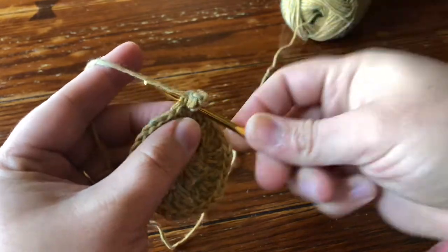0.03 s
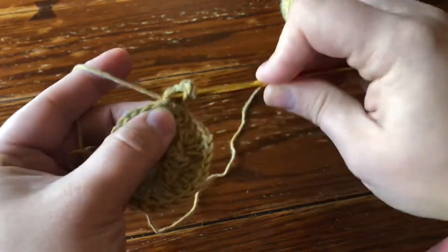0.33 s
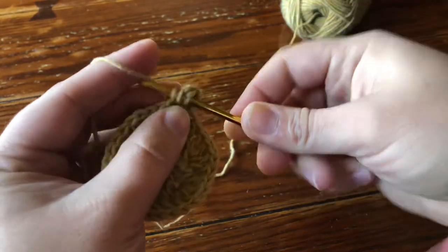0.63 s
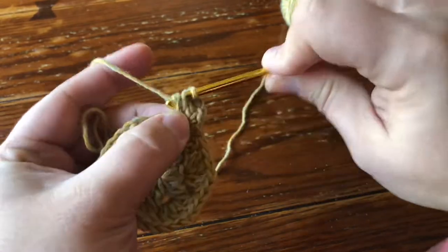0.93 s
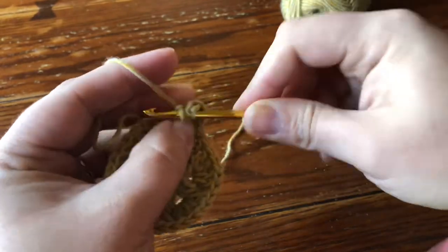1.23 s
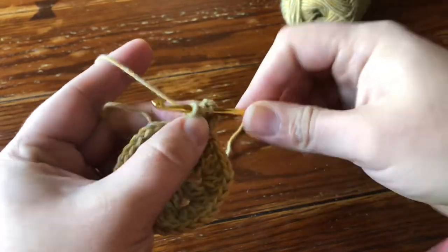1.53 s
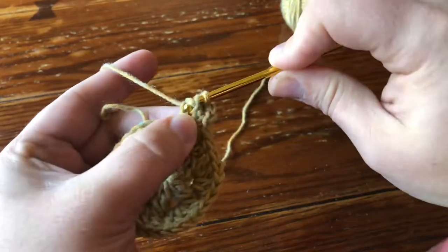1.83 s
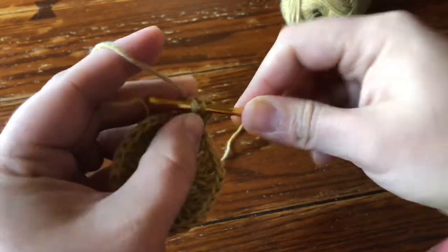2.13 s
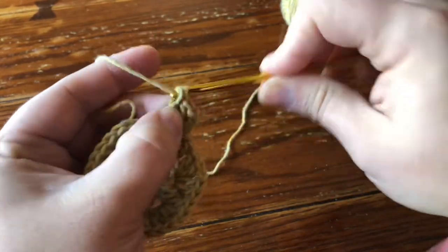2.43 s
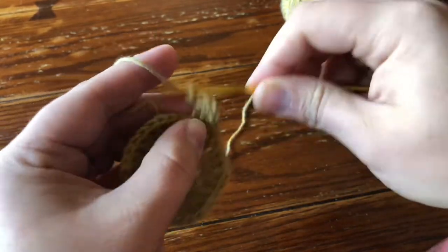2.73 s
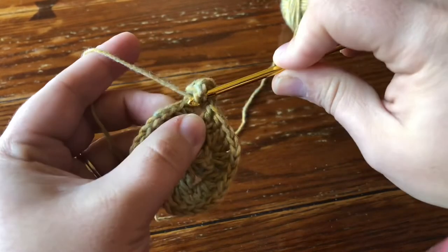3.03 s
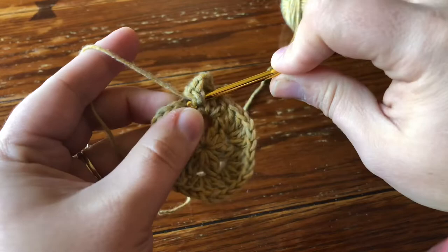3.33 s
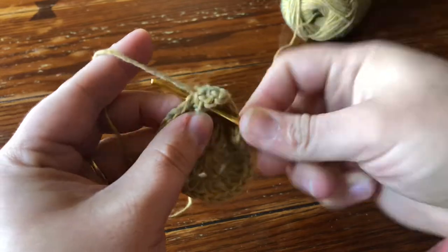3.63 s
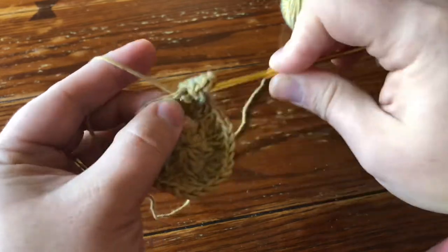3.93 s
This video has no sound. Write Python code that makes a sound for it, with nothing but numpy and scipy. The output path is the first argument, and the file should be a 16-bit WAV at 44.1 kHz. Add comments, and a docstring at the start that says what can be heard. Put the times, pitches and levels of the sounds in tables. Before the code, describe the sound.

Soft yarn rubs and tiny crochet hook ticks over a distant engine drone.

```python
"""Crocheting close to the microphone in a quiet room. From the start an engine, perhaps a distant
mower, drones through the walls over faint hiss, while the fabric shifts in the hands. A fibre
snaps off the hook with a tiny tick, then yarn is drawn briskly through a loop. Short rubs of
yarn over hook and fingers follow, with more ticks and two soft knocks of the hook. In the
second half the ticks stop and the rubs carry on over the drone."""
import sys
import numpy as np
from scipy import signal
from scipy.fft import rfft, irfft
from scipy.io import wavfile

SR = 44100
rng = np.random.default_rng(int(sys.argv[2]) if len(sys.argv) > 2 else 0)


def master_out(mix):
    """Clip the mix to full scale and print it as 16-bit PCM to the path in sys.argv[1]."""
    frames = np.transpose(np.atleast_2d(mix))
    ceiling = np.clip(frames, -1, 1)
    pcm = np.round(ceiling * 32767).astype(np.int16)
    wavfile.write(sys.argv[1], SR, pcm)


N = 176400


def amp(db):
    """Decibels to gain."""
    return 10 ** (np.asarray(db) / 20)


def unit(x):
    """Scales to rms 1."""
    return x / np.sqrt(np.mean(x ** 2) + 1e-20)


def colour(x, spectrum, tilt_db=0):
    """Filters by a spectrum, tilted in dB per octave above 1 kHz; rms 1."""
    hz = np.fft.rfftfreq(len(x), 1 / SR) + 1
    points_hz, points_db = np.transpose(spectrum)
    db = np.interp(np.log(hz), np.log(points_hz), points_db)
    db += tilt_db * np.log2(np.maximum(hz, 1000) / 1000)
    return unit(irfft(rfft(x) * amp(db), len(x)))


def drift(rate_hz):
    """Random wandering of rms about 1."""
    t = np.linspace(0, N / SR, 400)
    ratios = np.arange(1, 13)[:, None] / 12
    waves = np.sin(2 * np.pi * (rate_hz * ratios * t + rng.random(ratios.shape)))
    return np.interp(np.arange(N) / SR, t, waves.sum(0) / np.sqrt(len(ratios) / 2))


def add(mix, at, sound):
    """Mixes a sound in at a time in seconds."""
    part = mix[max(round(at * SR), 0):][:len(sound)]
    part += sound[:len(part)]


def ring(t, hz, t60):
    """One mode, struck at time zero."""
    return (t > 0) * np.exp(-np.log(1000) * abs(t) / t60) * np.sin(2 * np.pi * hz * t)


def engine(firing_hz=26.42, jitter_rad=0.0086, throb=0.032):
    """Far off, behind walls: firing harmonics swell and fade over a rumble that throbs with them."""
    # strong harmonics (multiple of the firing rate, [(time [s], level [dB]), ...])
    strong = [(4, [(0, -55), (.6, -55), (1.1, -58), (1.35, -54.5), (2.15, -54.5), (2.95, -60.5),
              (4, -53.5)]), (5, [(0, -59), (1.05, -57), (1.4, -62), (2.4, -58), (4, -61.5)]),
              (6, [(0, -63.5), (1, -53), (1.4, -59), (2.8, -57.5), (3.55, -51), (4, -51.5)]), (8, [(0, -62),
              (.5, -55.5), (1.1, -58.5), (1.35, -70), (1.8, -58), (2.4, -65.5), (4, -61.5)]),
              (9, [(1, -67.5), (1.9, -59), (2.7, -71.5)]), (12, [(0, -60), (1.8, -62.5), (2.3, -69.5),
              (3.2, -60.5), (4, -62)]), (16, [(0, -62.5), (.9, -75.5), (1.4, -65.5), (2, -78.5), (2.6, -68),
              (3.2, -65), (4, -76)])]
    # weak harmonics (multiple of the firing rate, level [dB])
    weak = [(2, -74), (10, -68), (13, -71.5), (14, -76.5), (15, -79.5), (20, -80.5), (26, -85.5)]
    # muffled rumble (frequency [Hz], relative level [dB])
    rumble_colour = [(20, -29.5), (45, -12), (100, -7.5), (140, -1), (240, 0), (315, -0.5), (350, -2.5),
                     (400, -10.5), (470, -12.5), (560, -18.5), (1000, -28), (2000, -48.5)]
    t = np.arange(N) / SR
    angle = 2 * np.pi * firing_hz * t + jitter_rad * drift(rate_hz=5)
    harmonics = [(k, np.interp(t, *np.transpose(curve))) for k, curve in strong]
    harmonics += [(k, db + drift(rate_hz=1.6)) for k, db in weak]  # wavering by about 1 dB
    drone = sum(amp(db) * np.sqrt(2) * np.cos(k * angle + 2 * np.pi * rng.random())
                for k, db in harmonics)
    throbbing = rng.standard_normal(N) * (1 + throb * np.cos(angle))
    return drone + amp(-58.5) * colour(throbbing, rumble_colour)


def room():
    """Room tone: even hiss and two faint, steady machine hums."""
    # hums of other machinery (frequency [Hz], level [dB])
    tones = [(56.7, -75), (170, -66.5)]
    # room hiss (frequency [Hz], relative level [dB])
    hiss_colour = [(100, 3.5), (900, 5), (1700, 0), (2350, -1), (2800, -3.5), (4000, -3.5), (7000, -10.5),
                   (16000, -17)]
    t = np.arange(N) / SR
    hum = sum(amp(db) * np.sqrt(2) * np.sin(2 * np.pi * (hz * t + rng.random())) for hz, db in tones)
    return hum + amp(-73) * colour(rng.standard_normal(N), hiss_colour)


def fabric():
    """The fabric shifts faintly in the hands, almost still towards the end."""
    # handling noise (time [s], level [dB])
    levels = [(0, -71), (1.3, -75), (1.8, -77.5), (2.85, -76), (3.15, -79), (3.5, -78.5), (3.7, -78.5)]
    # fabric rustle (frequency [Hz], relative level [dB])
    rustle_colour = [(1000, -2.5), (1800, -5), (2350, 0), (3000, -8.5), (16000, -11)]
    envelope = amp(np.interp(np.arange(N) / SR, *np.transpose(levels)))
    return envelope * colour(rng.standard_normal(N), rustle_colour)


def fibre_ticks(chatter_s=0.0006, tail_s=0.008):
    """Close up, fibres let go: each a snap, brief chatter and a faint tail, while the hook rings."""
    # snaps (time [s], level [dB], band centre [Hz], band width [octaves], hook ring level [dB])
    ticks = [(.1042, -72, 7000, 0.71, -79.5), (0.4592, -70.5, 15000, 0.27, -75.5),
             (.486, -78, 14000, 0.3, -88), (0.492, -81, 13000, 0.6, -82), (0.5085, -73.5, 4500, 0.57, -85),
             (0.5243, -70, 10000, 1.8, -73.5), (1.449, -79.5, 7000, 1.1, -85),
             (0.985, -76, 13000, 0.84, -92), (2.1116, -67.5, 12000, 2.2, -73.5)]
    # crisp snap (frequency [Hz], relative level [dB])
    snap_colour = [(1000, -24), (2500, 7), (16000, 6)]
    # the hook's modes, damped by the fingers (frequency [Hz], relative level [dB])
    hook_modes = [(2450, -1), (4950, 1), (7350, -5)]
    t = (np.arange(2048) - 128) / SR
    hz = np.fft.rfftfreq(len(t), 1 / SR) + 1
    decay = (t > 0) * (np.exp(-abs(t) / chatter_s) + amp(-24) * np.exp(-abs(t) / tail_s))
    hook_ring = unit(sum(amp(db) * ring(t, mode_hz, t60=0.0084) for mode_hz, db in hook_modes))
    out = np.zeros(N)
    for at, db, centre_hz, octaves, ring_db in ticks:
        burst = 6 * (t == 0) + decay * rng.choice([-1, 1], len(t))
        band = np.exp(-(np.log2(hz / centre_hz) / octaves) ** 2 / 2)
        snap = colour(irfft(band * rfft(burst)), snap_colour)
        add(out, at + t[0], amp(db) * snap + amp(ring_db) * hook_ring)
    return out


def stroke(middle, length, db, spectrum, edge, spread_db, tilt_db=0, slips_per_s=6000):
    """One slide of yarn: dense fibre slips under a rounded swell. Gives start time and sound."""
    size = SR // 2
    start = max(middle - size / SR / 2, 0)
    t = start + np.arange(size) / SR
    slips = rng.standard_normal(size) * (rng.random(size) < slips_per_s / SR)
    slips *= amp(spread_db * np.minimum(rng.exponential(1, size), 4))
    swell = np.exp(-abs(2 * (t - middle) / length) ** edge / 2)
    return start, amp(db) * swell * colour(slips, spectrum, tilt_db)


def yarn():
    """Close to the microphone, yarn is pulled once through a loop, then rubs over hook and fingers."""
    # the brisk pull (middle time [s], length [s], level [dB])
    pull = (.32, 0.046, -55)
    # friction in the loop (frequency [Hz], relative level [dB])
    pull_colour = [(300, -12), (1100, -3), (1800, -17), (2600, -.5), (3100, -6), (3900, 0), (4500, -3),
                   (6500, 1), (7500, 5), (8400, -1), (9800, -3), (11000, -8), (16000, -4)]
    # rubs (middle time [s], length [s], level [dB], brightness [dB/octave])
    rubs = [(0.365, 0.03, -73, 3), (0.503, 0.025, -62.5, 4), (0.625, 0.06, -66.5, 0),
            (0.82, 0.14, -74.5, 2.5), (0.974, 0.03, -70.5, 3), (1.155, 0.072, -69, 3),
            (1.288, 0.14, -71, -1.5), (1.29, 0.035, -63.5, 1), (1.654, 0.14, -74, 3.5),
            (1.995, 0.13, -75, 4), (2.165, 0.066, -70, 1), (2.513, 0.15, -72, 5),
            (2.575, 0.017, -70.5, -0.5), (2.817, 0.096, -71.5, -1), (2.94, 0.084, -72.5, 1.5),
            (3.221, 0.045, -76.5, -1), (3.598, 0.051, -70.5, 2.5), (3.666, 0.071, -67.5, 1.5),
            (3.863, 0.18, -72, 1.5), (3.972, 0.041, -62.5, 0.5)]
    # friction on hook and fingers (frequency [Hz], relative level [dB])
    rub_colour = [(300, -5), (1000, 2.5), (1700, -7.5), (2500, 0.5), (3100, -3), (4300, -1.5), (5000, 3.5),
                  (6500, -.5), (9000, -2), (16000, -5.5)]
    out = np.zeros(N)
    add(out, *stroke(*pull, pull_colour, edge=3, spread_db=2.5))
    for middle, length, db, tilt_db in rubs:
        # the grip changes, so each rub has a slightly different colour
        spectrum = [(hz, level + 1.1 * rng.standard_normal()) for hz, level in rub_colour]
        add(out, *stroke(middle, length, db, spectrum, edge=2.2, spread_db=0.5, tilt_db=tilt_db))
    return out


def hook_knocks(thud_s=0.0023):
    """The hook meets the fingers: a soft thud and one short ring, whose pitch depends on the grip."""
    # knocks (time [s], ring level [dB], ring frequency [Hz], thud brightness [dB/octave])
    knocks = [(0.727, -78.5, 3400, -6.5), (1.2298, -76.5, 2420, -1)]
    # soft thud (frequency [Hz], relative level [dB])
    thud_colour = [(300, -10), (1100, -3), (16000, -7)]
    t = (np.arange(2048) - 128) / SR
    out = np.zeros(N)
    for at, db, ring_hz, tilt_db in knocks:
        burst = (t > 0) * np.exp(-abs(t) / thud_s) * rng.standard_normal(len(t))
        thud = amp(4.5) * colour(burst, thud_colour, tilt_db)
        add(out, at + t[0], amp(db) * (unit(ring(t, ring_hz, t60=0.012)) + thud))
    return out


def scene():
    """Close handwork in front of the distant drone, in mono."""
    background = engine() + room()
    friction = fabric() + yarn()
    catching = amp(1.7 * drift(rate_hz=72.7))  # fabric and yarn catch unevenly
    return (background + friction * catching + fibre_ticks() + hook_knocks())[None]


def record(dry):
    """The recorder passes nothing much above 15.9 kHz."""
    lowpass = signal.firwin(511, 15900, window=("kaiser", 9), fs=SR)
    return signal.oaconvolve(dry, lowpass[None], "same")


dry = scene()
out = record(dry)
master_out(out)
```